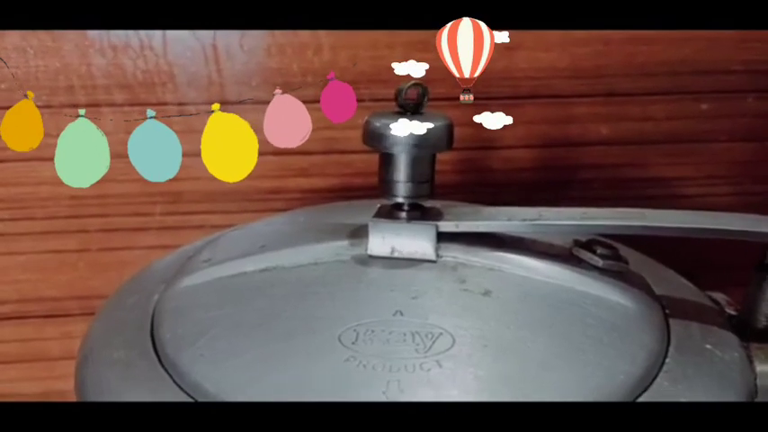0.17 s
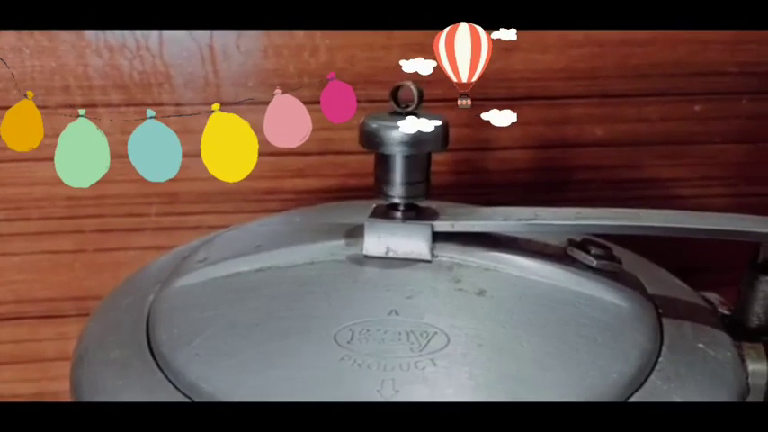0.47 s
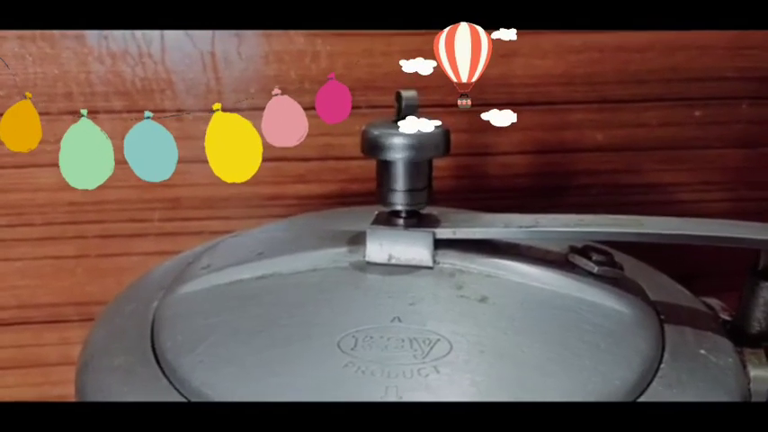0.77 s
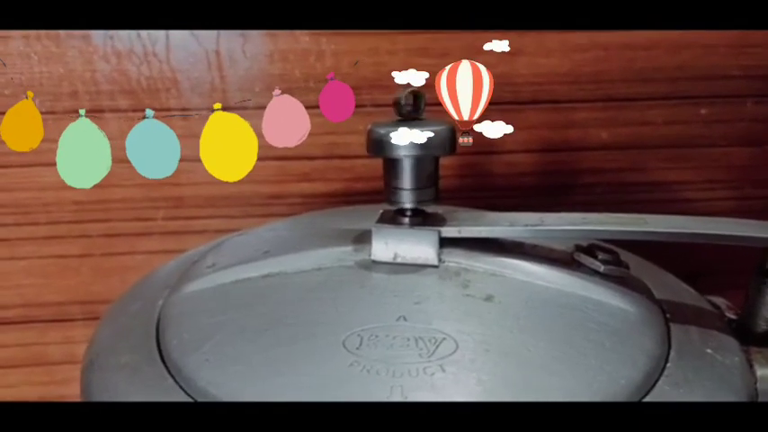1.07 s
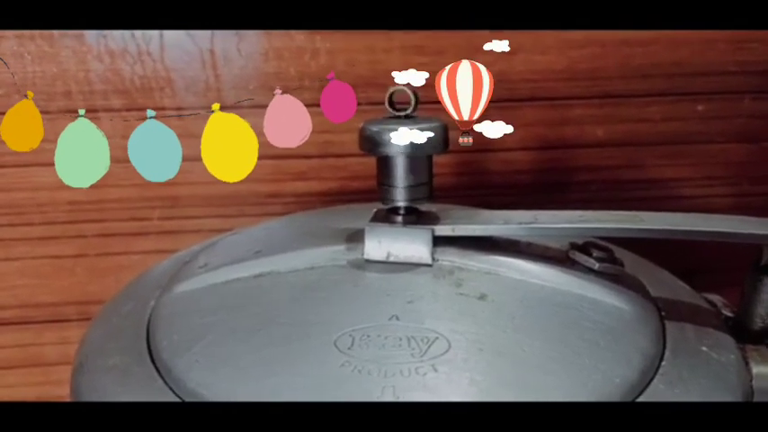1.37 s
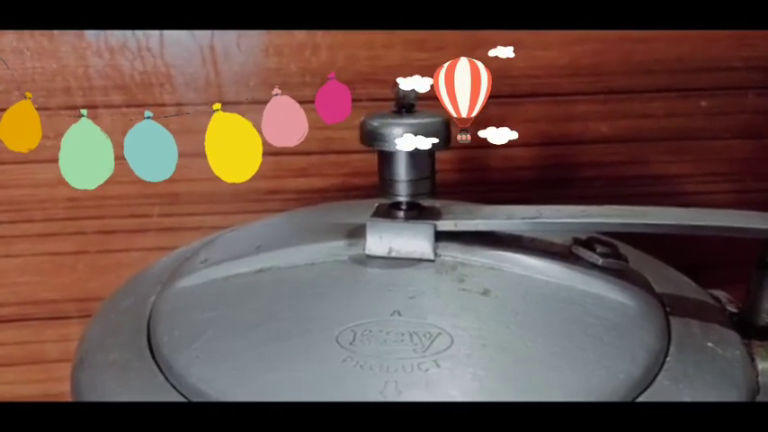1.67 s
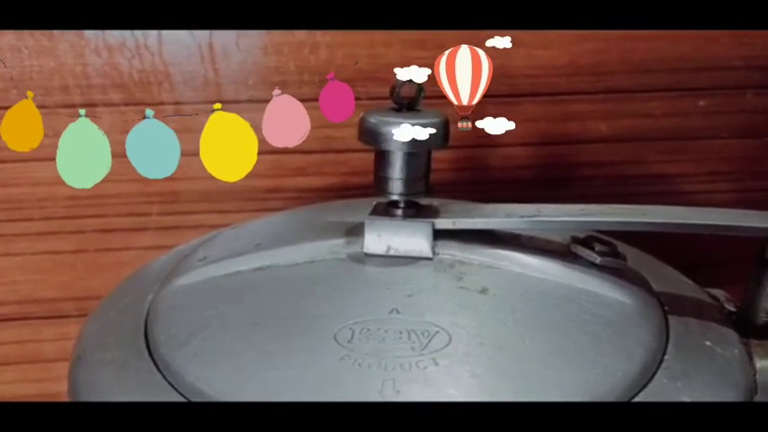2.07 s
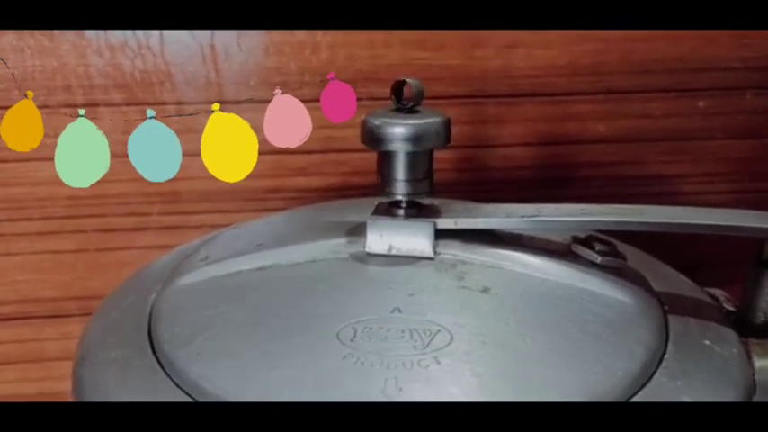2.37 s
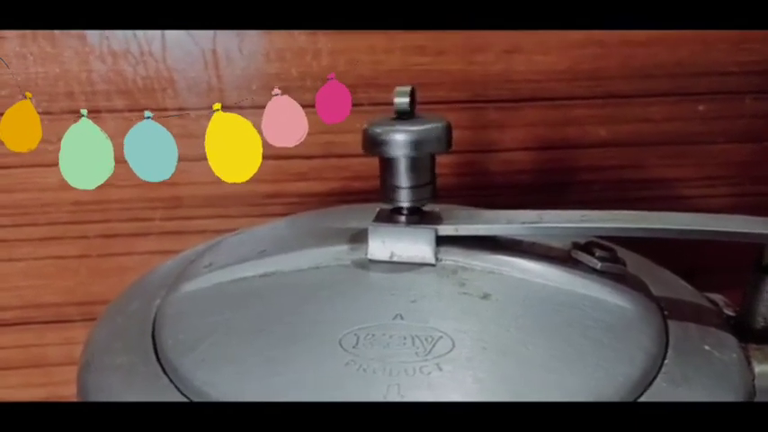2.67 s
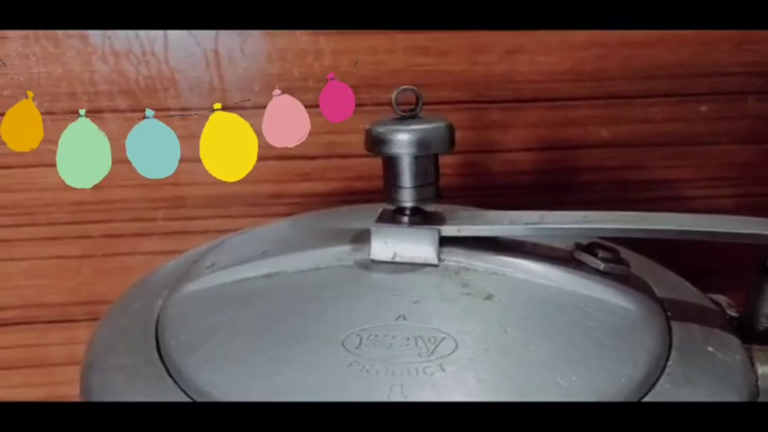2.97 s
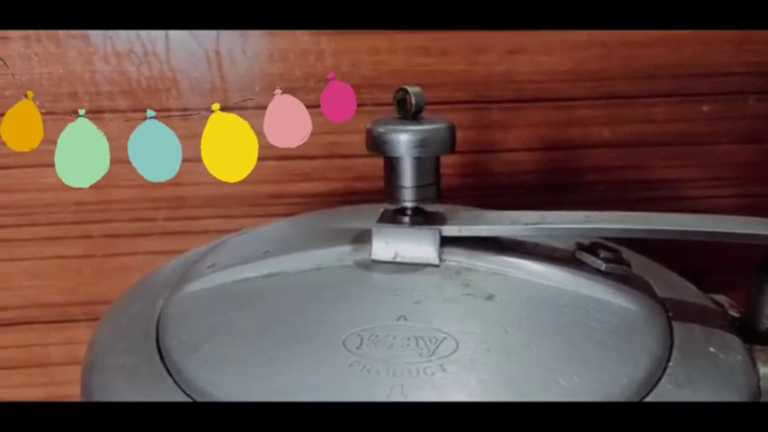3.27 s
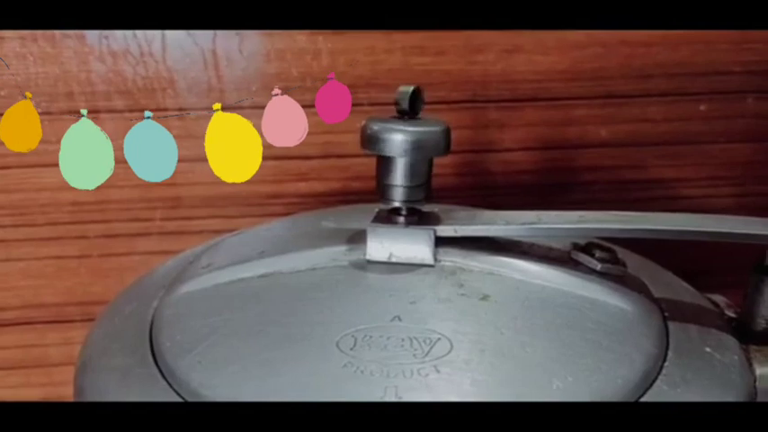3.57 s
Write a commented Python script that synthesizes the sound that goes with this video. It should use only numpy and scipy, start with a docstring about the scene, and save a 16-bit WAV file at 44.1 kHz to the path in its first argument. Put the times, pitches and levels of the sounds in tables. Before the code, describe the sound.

A pressure cooker hisses close to the microphone, letting out steam in rapid puffs as its weight ticks faintly and droplets spit. Later the simmer grows and a lower gush swells as the puffs slow.

```python
"""A pressure cooker, close to the microphone, in front of a wooden wall.
From the start the weight wobbles on its vent and lets the hissing steam out in puffs, about 14 a second,
each louder and brighter than the jet between. Droplets spit, the weight ticks, the pot simmers and hums.
Around one second a faint whistle comes and goes. From two seconds the boil grows and a lower gush
comes in, swelling at the end as the puffs slow down."""
import sys
import numpy as np
from scipy import signal
from scipy.fft import rfft, irfft, next_fast_len
from scipy.io import wavfile
from scipy.ndimage import map_coordinates

SR = 44100
rng = np.random.default_rng(int(sys.argv[2]) if len(sys.argv) > 2 else 0)


def unload_audio(sound):
    """Save the sound as a 16-bit wav file, at the path given as the first command line argument."""
    columns = np.transpose(np.atleast_2d(sound))
    # keep every value between -1 and 1, then stretch to whole-number steps
    steps = np.round(np.clip(columns, -1, 1) * 32767)
    wavfile.write(sys.argv[1], SR, steps.astype(np.int16))


N = 164052


def amp(db):
    """Decibels to gain."""
    return 10 ** (np.asarray(db) / 20)


def unit(x):
    """Scale to rms 1."""
    return x / np.sqrt(np.mean(x ** 2) + 1e-20)


def curve(rows):
    """(time, value) points to one value per sample."""
    return np.interp(np.arange(N) / SR, *np.transpose(rows))


def wobble(per_s):
    """A smooth random curve with per_s knots a second."""
    return map_coordinates(rng.standard_normal(N // 20), [np.arange(N) * per_s / SR], mode="wrap")


def filtered(x, response):
    """Filter x by a gain given as a function of frequency."""
    size = next_fast_len(N + SR // 2)
    return irfft(rfft(x, size) * response(np.fft.rfftfreq(size, 1 / SR)), size)[..., :N]


def coloured(x, spectrum):
    """Shape x by (frequency, level) points, silent beyond both ends."""
    points_hz, db = np.transpose(spectrum)

    def response(hz):
        gain = amp(np.interp(np.log(hz + 1), np.log(points_hz + 1), db))
        return gain * (hz > points_hz[0]) * (hz < points_hz[-1])
    return filtered(x, response)


def noise(spectrum):
    """Coloured noise of rms 1."""
    return unit(coloured(rng.standard_normal(N), spectrum))


def ring(x, modes):
    """x through a set of resonances, at rms 1."""
    def response(hz):
        return sum(amp(db) * 1j * hz * width / (centre ** 2 - hz ** 2 + 1j * hz * width)
                   for centre, width, db in modes)
    return unit(filtered(x, response))


def ticks(per_s, spread_db):
    """Random impulses whose sizes scatter by spread_db."""
    impulses = (rng.random(N) < per_s / SR) * rng.choice([-1, 1], N)
    return impulses * amp(spread_db * np.clip(rng.standard_normal(N), -2, 2))


# the kitchen's low rumble (frequency [Hz], level [dB])
ROOM_SPECTRUM = [(20, -12), (55, -6), (90, 1.5), (200, -1.5), (280, -6), (500, -51)]


def room_tone():
    """A steady low rumble lies under everything."""
    return amp(-65) * noise(ROOM_SPECTRUM)


def kitchen(x, echo_db=-14, t60_s=0.16):
    """Close surfaces return a short, dense echo to the microphone."""
    t = np.arange(SR // 4) / SR
    tail = rng.standard_normal(len(t)) * amp(-60 * t / t60_s)
    echo = signal.fftconvolve(x, tail / np.linalg.norm(tail))[:N]
    return (x + amp(echo_db) * echo) / np.hypot(1, amp(echo_db))


# loudness of the low hum (time [s], level [dB])
HUM_LEVEL = [(0, -64), (.25, -59.5), (.38, -71), (.52, -63.5), (1.4, -66.5), (1.65, -59.5), (1.9, -82),
             (3.72, -68)]


def hum(pitch_hz=184.3, waver_hz=4.1, waver_db=2.5):
    """A faint low note wavers, drops away halfway through and creeps back."""
    phase = 2 * np.pi * np.cumsum(pitch_hz + waver_hz * wobble(per_s=22)) / SR
    return amp(curve(HUM_LEVEL) + waver_db * wobble(per_s=14)) * unit(np.sin(phase))


# the pot's hollow resonances (frequency [Hz], width [Hz], level [dB])
POT_MODES = [(79, 10, -13), (123.7, 10.5, -1.5), (186.7, 18, -1), (360.4, 10, -0.5), (525, 10, 0.5)]
# strength of the boil (time [s], level [dB])
BOIL_LEVEL = [(0, -67.5), (1.9, -68), (2.8, -63), (3.1, -60), (3.72, -64)]


def pot(swell_at_s=2.54, swell_width_s=0.09, swell_db=-55):
    """Boiling water stirs the pot's resonances; the top one swells once."""
    t = np.arange(N) / SR
    envelope = amp(swell_db) * np.exp(-((t - swell_at_s) / swell_width_s) ** 2)
    swell = envelope * ring(rng.standard_normal(N), POT_MODES[-1:])
    simmer = amp(curve(BOIL_LEVEL)) * ring(rng.standard_normal(N), POT_MODES)
    return simmer + swell


# loudness of the whistle at the vent (time [s], level [dB])
WHISTLE_LEVEL = [(0, -53), (.78, -52.5), (.85, -44), (1.0, -57), (1.06, -47), (1.2, -50), (1.35, -56),
                 (3.72, -51)]
# resonance of the gap (frequency [Hz], width [Hz], level [dB])
GAP_MODE = [(3555, 45, 0)]


def whistle():
    """A breathy note comes and goes in the gap under the weight."""
    return amp(curve(WHISTLE_LEVEL)) * ring(rng.standard_normal(N), GAP_MODE)


# loudness of the gush (time [s], level [dB])
GUSH_LEVEL = [(0, -106), (1.7, -73), (2.2, -56.5), (3.25, -54), (3.38, -47), (3.45, -48), (3.58, -54),
              (3.66, -38.5), (3.72, -44)]
# its colour (frequency [Hz], level [dB])
GUSH_SPECTRUM = [(150, -23), (400, -10), (680, 3), (950, -7.5), (1300, 4), (1950, -4), (2300, 2.5),
                 (3300, 0), (4000, -1), (7000, -33)]


def gush(sputter_db=0.78):
    """A lower, sputtering rush of steam swells towards the end."""
    return amp(curve(GUSH_LEVEL) + sputter_db * wobble(per_s=40)) * noise(GUSH_SPECTRUM)


# the weight's ring (frequency [Hz], width [Hz], level [dB])
WEIGHT_MODES = [(5645, 35, -7), (6335, 30, 0), (6452, 30, -2), (6817, 30, -1), (9560, 35, -9),
                (10630, 60, -7), (12390, 40, -6)]


def weight(flow_db):
    """The steel weight chatters on the vent, harder as it lifts."""
    knocks = ticks(per_s=90, spread_db=2.5) * amp(flow_db)
    return amp(-43) * ring(knocks, WEIGHT_MODES)


# the loudest spits of water (time [s], level [dB])
WATER_SPITS = [(.357, -28), (.945, -28), (1.158, -27), (1.369, -29), (1.948, -26), (2.695, -28),
               (3.341, -26), (3.464, -24), (3.662, -24)]
# the vent's resonance, shared by droplets and hiss (frequency [Hz], level [dB])
VENT_SPECTRUM = [(4450, -15.6), (4670, -11), (4970, -13.3), (5230, -6.2), (5750, -3.9), (6200, -.3),
                 (6850, -3), (6960, -7.6), (7410, -9.2), (7700, -14)]
VENT_SWING = 0.57  # dB of sound per dB of flow


def droplets(flow_db, spray_db=-40, spit_decay_s=0.0018):
    """Fine spray and a few bigger spits sound in the vent's resonance."""
    t = np.arange(N) / SR
    drops = coloured(ticks(per_s=350, spread_db=0), VENT_SPECTRUM)
    spray = amp(spray_db) * unit(drops * amp(VENT_SWING * flow_db))
    spits = sum(amp(db) * (t >= at) * np.exp(-np.abs(t - at) / spit_decay_s) for at, db in WATER_SPITS)
    return spray + spits * noise(VENT_SPECTRUM)


# puffs as the weight lifts (time [s], rise of the flow [dB], length [s])
STEAM_PUFFS = [(0.024, 4, 0.04), (0.09, 3, 0.046), (0.155, 5.5, 0.047), (0.215, 4.3, 0.02),
               (0.293, 4.8, 0.036), (0.35, 5.3, 0.023), (0.426, 5, 0.067), (0.499, 3.8, 0.028),
               (0.564, 3, 0.033), (0.633, 3.5, 0.1), (0.706, 3, 0.035), (0.765, 2, 0.05),
               (0.837, 5.5, 0.051), (0.914, 4, 0.036), (0.97, 5.5, 0.025), (1.047, 6.5, 0.021),
               (1.118, 4.5, 0.032), (1.168, 5, 0.03), (1.242, 5, 0.036), (1.313, 4, 0.032),
               (1.378, 5, 0.028), (1.44, 2, 0.059), (1.517, 6, 0.044), (1.598, 2.6, 0.033),
               (1.659, 5.5, 0.048), (1.721, 1.5, 0.07), (1.782, 5.5, 0.051), (1.85, 3.5, 0.031),
               (1.927, 5, 0.039), (1.99, 4.5, 0.054), (2.064, 4.5, 0.056), (2.146, 3, 0.032),
               (2.21, 4.2, 0.062), (2.295, 5.5, 0.061), (2.38, 3, 0.048), (2.453, 3.5, 0.074),
               (2.538, 4, 0.029), (2.599, 3.5, 0.057), (2.708, 6.5, 0.067), (2.805, 3.5, 0.094),
               (2.903, 2, 0.08), (2.995, 3, 0.056), (3.077, 2, 0.11), (3.195, 2, 0.068), (3.275, 1.5, 0.07),
               (3.368, 8.5, 0.065), (3.498, 4.5, 0.1), (3.645, 6.5, 0.14)]


def flow(pressure_db_per_s=0.61, flutter_db=0.66, steepness=5.3):
    """Steam flow in dB: slowly rising pressure, flat-topped puffs and a fast flutter."""
    t = np.arange(N) / SR
    puffs = sum(db / (1 + np.abs(2 * (t - at) / length) ** steepness) for at, db, length in STEAM_PUFFS)
    return pressure_db_per_s * t + puffs + flutter_db * wobble(per_s=87)


# the jet below the vent's resonance (frequency [Hz], level [dB])
RUSH_SPECTRUM = [(150, -45), (300, -26.5), (370, -24.5), (520, -24), (800, -25.5), (1340, -21.5),
                 (1440, -25), (1570, -26), (1870, -24), (1960, -26.5), (2130, -21), (2670, -21),
                 (2780, -17.3), (3230, -19), (3540, -17), (3640, -20), (3790, -23), (3920, -18.7),
                 (4450, -18.3)]
# the jet above it (frequency [Hz], level [dB])
FIZZ_SPECTRUM = [(7700, -15), (8200, -13), (8380, -15.5), (9000, -11.7), (9190, -15.5), (9540, -7.7),
                 (9860, -7.5), (10120, -15), (10420, -6.6), (10620, -6.6), (10900, -13.3), (11430, -10.5),
                 (11650, -6.2), (12320, -4.7), (12550, -7.7), (12900, -6), (14450, -16.5), (15100, -17)]


def jet(flow_db, drift_db=0.94, top_from_hz=11500):
    """Turbulence in the vent, heard close; the fizz follows the flow most, so puffs are brighter."""
    rush_db = -47 + 0.65 * flow_db + drift_db * wobble(per_s=22)
    rush = amp(rush_db) * noise(RUSH_SPECTRUM)
    hiss_db = -32.5 + VENT_SWING * flow_db + drift_db * wobble(per_s=22)
    grain_db = 0.62 * wobble(per_s=630)
    hiss = amp(hiss_db + grain_db) * noise(VENT_SPECTRUM)
    treble = noise(FIZZ_SPECTRUM)
    top = filtered(treble, lambda hz: hz > top_from_hz)
    fizz = (treble - top) * amp(0.95 * flow_db) + top * amp(1.014 * flow_db)
    return rush + hiss + amp(-35) * fizz


def scene():
    """Close steam with its echo, over the pot and the room, alike in both channels."""
    flow_db = flow()
    steam = jet(flow_db) + gush() + whistle() + droplets(flow_db) + weight(flow_db)
    mono = kitchen(steam) + pot() + room_tone() + hum()
    return np.array([mono, mono])


def record(dry, cutoff_hz=15080):
    """The microphone's signal holds nothing above the cutoff."""
    return filtered(dry, lambda hz: hz < cutoff_hz)


dry = scene()
out = record(dry)
unload_audio(out)
```